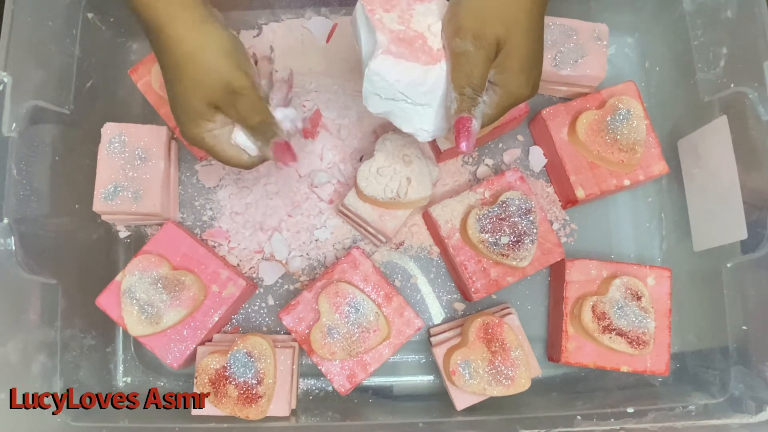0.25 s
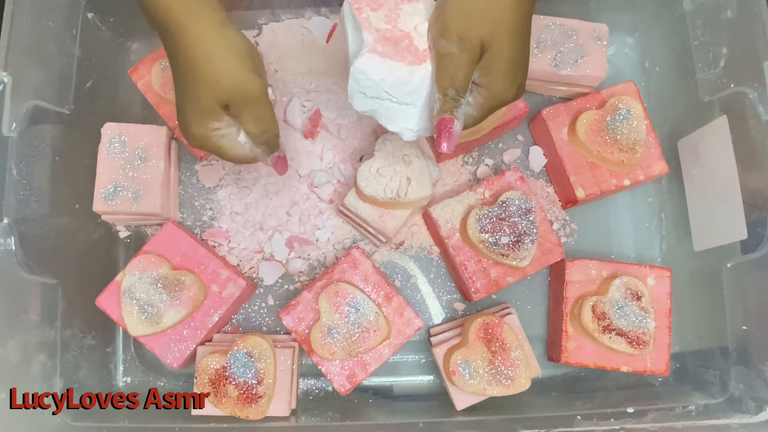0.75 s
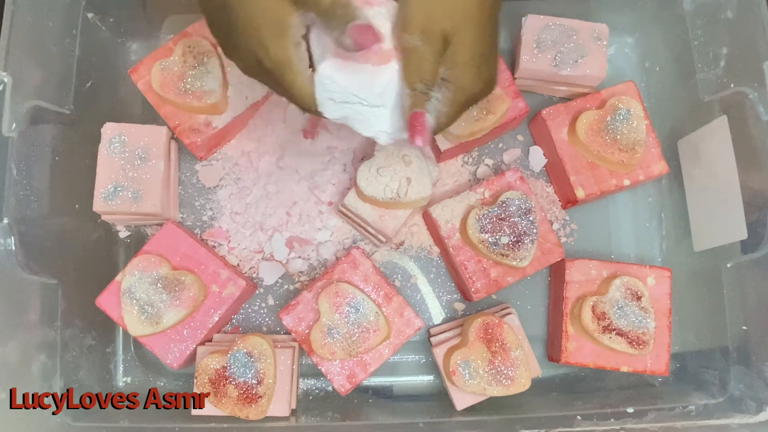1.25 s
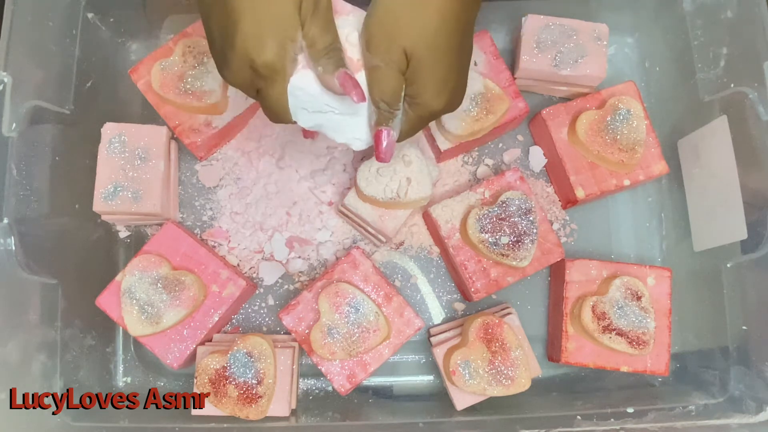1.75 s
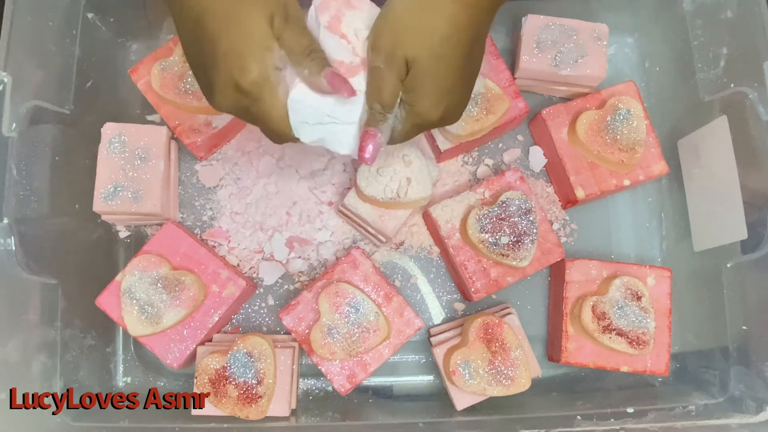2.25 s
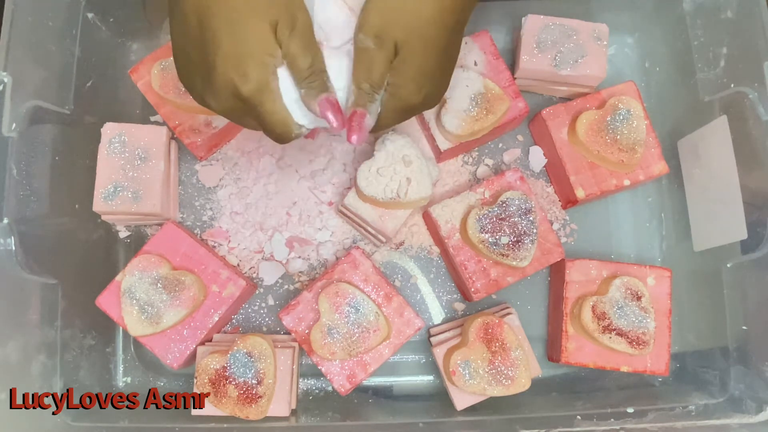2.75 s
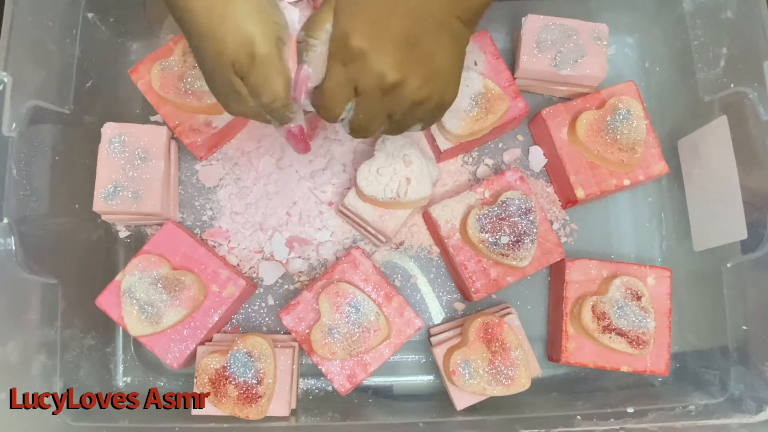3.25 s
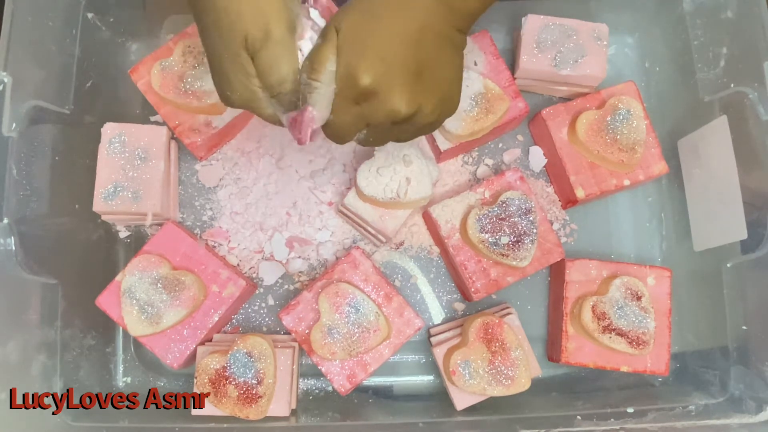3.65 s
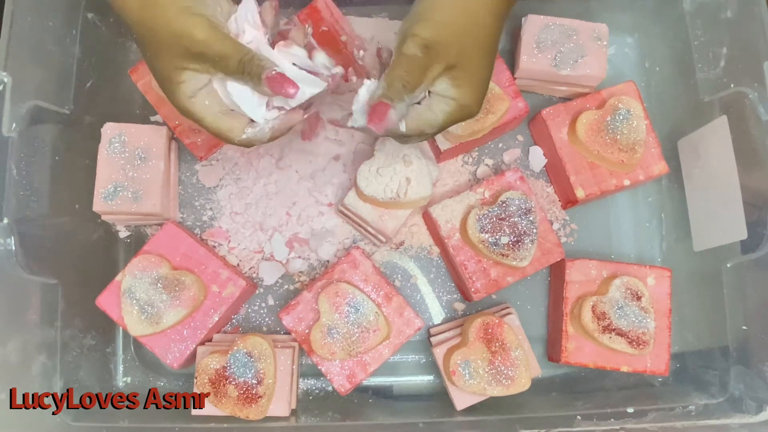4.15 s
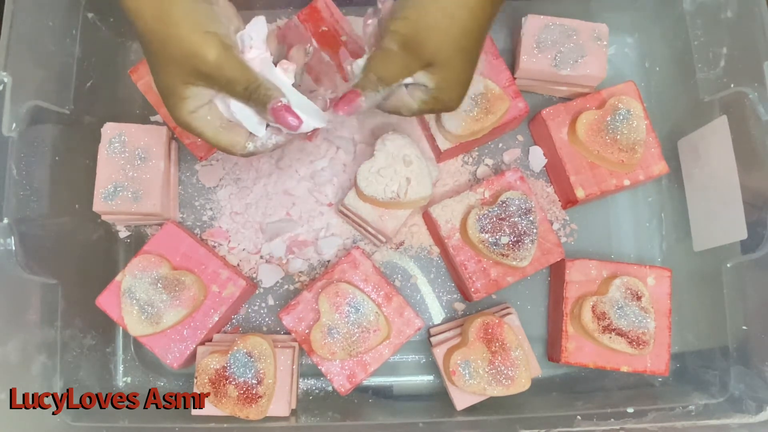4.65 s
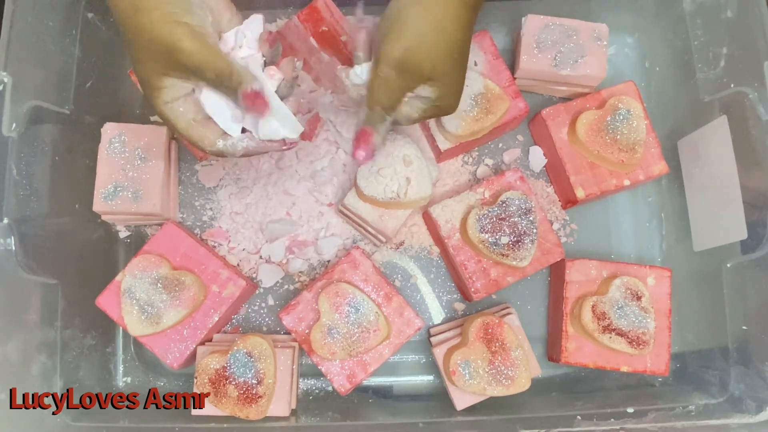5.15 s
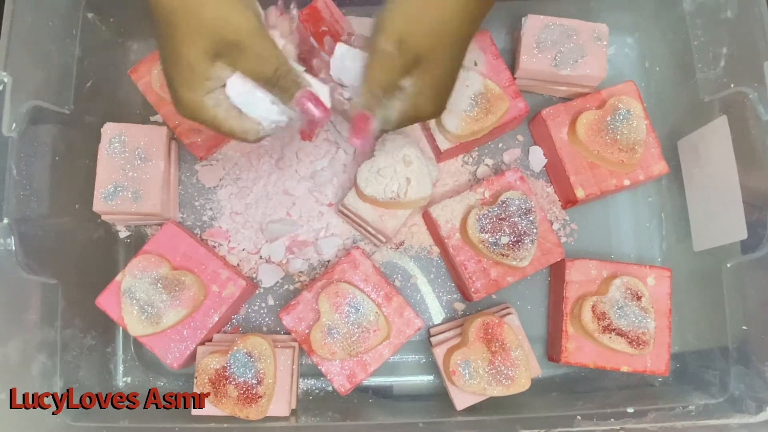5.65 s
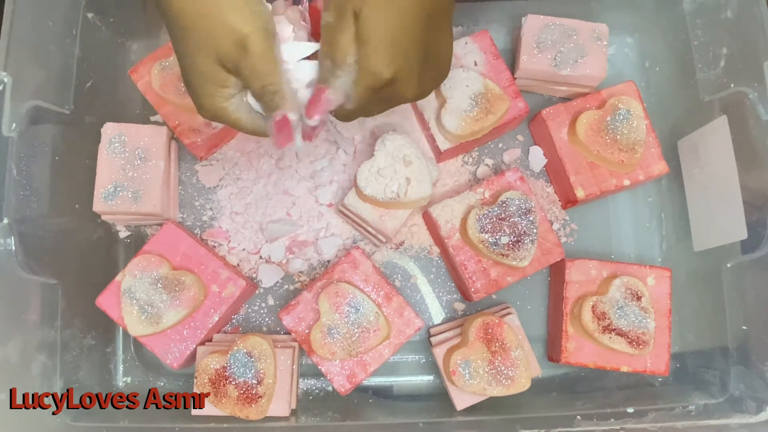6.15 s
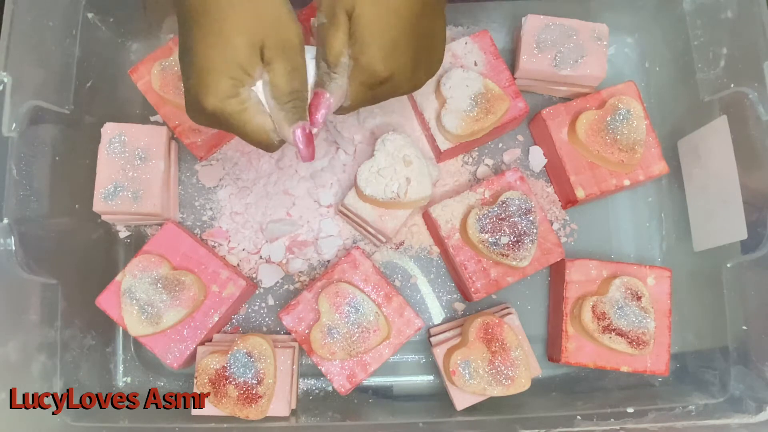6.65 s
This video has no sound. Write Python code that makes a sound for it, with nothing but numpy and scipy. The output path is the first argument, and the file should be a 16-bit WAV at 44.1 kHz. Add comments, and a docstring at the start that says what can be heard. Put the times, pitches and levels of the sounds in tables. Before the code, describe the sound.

Dry chalk blocks crack and crumble in hands over a plastic tub, with gritty crunches, small ticks and one heavy, hollow thump midway.

```python
"""Hands crumble and snap dry chalk blocks over a plastic tub, close to a phone in a small room.
Each crack is a quick shower of tiny clicks plus a knock: the ringing tones of the whole block.
Powder, grit and flakes are random clicks that swell as the fingers squeeze; a few shards ping.
Falling tones and ringing modes make the tub thump, most heavily once; the room adds a short tail.
Filtered noise and wavering tones make a low rumble and hum underneath."""
import sys
import numpy as np
from scipy import signal
from scipy.fft import rfft, irfft
from scipy.io import wavfile

SR = 44100
rng = np.random.default_rng(int(sys.argv[2]) if len(sys.argv) > 2 else 0)


def inscribe(sig):
    """Save sig as 16-bit PCM at rate SR to the path in sys.argv[1].

    A 1-D sig is mono; a 2-D sig holds one channel per row.
    Samples are clipped to [-1, 1] before scaling.
    """
    pcm = np.round(np.clip(np.atleast_2d(sig).T, -1, 1) * 32767)
    wavfile.write(sys.argv[1], SR, pcm.astype(np.int16))


N = 304284
T = np.arange(N) / SR  # time in seconds

# Low noise of the room. Each row: pitch in Hz, relative strength in dB per Hz.
RUMBLE = [(22, -39.5), (45, -1.5), (80, 0.5), (125, -1), (200, -6.5), (290, -13), (420, -16.5), (560, -24),
          (900, -23.5), (1400, -30), (2000, -32.5), (3000, -44.5), (6000, -56.5), (16000, -60.5)]
RUMBLE_DB = -53.5  # level of the whole rumble

# Hum tones in the room. Each row: pitch in Hz, level in dB.
HUM = [(87, -64.5), (119, -63.5), (160, -61), (269, -67.5), (532, -75)]

# How alike the two microphone ports hear. Each row: pitch in Hz, likeness from 0 to 1.
LIKENESS = [(60, .89), (130, .93), (250, .92), (600, .74), (1500, .42), (3000, .42), (6000, .3),
            (7000, .75), (11000, .93)]

# How much louder the left port hears. Each row: pitch in Hz, difference in dB.
LEFT_DB = [(100, 2), (500, 2.3), (4000, 2.8), (8000, .7), (14000, 1)]
TOP_HZ = 16100  # the phone cuts everything above this

# Thin ring of the tub walls. Each row: pitch in Hz, relative level in dB.
WALL_RING = [(1296, -11), (1620, 9.5), (2065, 0), (2361, 7.5), (2696, 10), (2881, 9), (3526, 9.5),
             (3762, 10), (4226, 7.5), (4364, 15), (4783, 6), (5590, -37), (6600, -4.5), (7227, -15.5)]

# Pitch ranges of the room's tail. Each row: low edge in Hz, high edge in Hz.
TAIL_BANDS = [(150, 900), (900, 2600), (2600, 7400), (9500, 16500)]
# Tail in each range. Each row: starting level in dB, time to fall by 60 dB in seconds.
TAILS = [(-35.5, 0.18), (-33.0, 0.23), (-34.5, 0.23), (-40.5, 0.18)]

# Fingers squeezing and rubbing. Each row: hardest moment in seconds, length in seconds,
# level in dB, coarse grit against fine powder in dB.
SQUEEZES = [(0.155, 0.074, -82.5, -5), (0.47, 0.094, -83, 0.5), (0.653, 0.035, -78.5, 5),
            (0.86, 0.08, -85.5, 0.5), (1.09, 0.092, -77.5, 0), (1.34, 0.097, -78, -2.5),
            (1.485, 0.079, -84.5, -2), (2.085, 0.17, -77, 6.5), (2.39, 0.16, -78, -3),
            (2.606, 0.14, -72, -2), (2.682, 0.023, -66.5, -8.5), (2.783, 0.059, -78.5, -1),
            (2.86, 0.03, -74.5, 0), (2.989, 0.066, -67.5, 4.5), (3.093, 0.045, -70.5, 3),
            (3.23, 0.48, -87, 9), (3.696, 0.042, -93, 15.5), (3.93, 0.24, -77.5, -2),
            (4.086, 0.12, -74.5, 5.5), (4.225, 0.12, -78.5, 4.5), (4.4, 0.12, -82.5, 2),
            (4.57, 0.045, -79.5, 6), (4.896, 0.081, -86, 4), (5.157, 0.16, -81, -5.5),
            (5.412, 0.08, -89, 9), (5.572, 0.47, -81, 1), (5.75, 0.13, -95, -10), (5.973, 0.029, -78, 2),
            (6.14, 0.035, -76, -16), (6.44, 0.16, -83, 9), (6.66, 0.77, -88, -1.5)]
# A squeeze builds over this share of its length; between squeezes the fingers barely brush (dB).
BUILD_SHARE, BRUSH_DB = 0.44, -101.5

# Grain sizes from powder to crumbs. Each row: low edge in Hz, high edge in Hz, grains per second.
GRAINS = [(13800, 16000, 7000), (9900, 12800, 7000), (5000, 8200, 4000), (2700, 5500, 2200),
          (600, 2600, 900)]

# The four registers (pitch ranges) of a fracture. Each row: low edge in Hz, high edge in Hz.
REGISTERS = [(650, 2400), (2500, 7100), (10000, 12500), (14100, 15800)]
FLAKE_COLOUR_DB = [-19, -3, -11, -3.5]  # flakes against the grit in each register

# Modes (ringing tones) of a thin, hard shard. Each row: pitch in Hz before scaling to the shard's # size,
# relative level in dB, multiple of the shard's fading time.
SHARD = [(3160, 15, 1.1), (3490, -22, 8), (5085, -7, 6.6), (6330, -13, 3.2)]
# Shards snapping off. Each row: start in seconds, level in dB, lowest mode in Hz, # fading time in seconds
# (each mode falls by 60 dB in this times its multiple).
CLINKS = [(4.6705, -48.5, 3050, 0.014), (5.8263, -44, 2010, 0.0043), (6.4815, -55.5, 1940, 0.0057)]
CLINK_ROOM_SHARE = .45  # cupped in the hands, shards send only this share into the room

# Blows on the tub. Each row: start in seconds, level in dB, upper edge of the blow in Hz.
THUMPS = [(0.665, -28.5, 102), (1.953, -54, 1000), (3.003, -16, 4000), (3.442, -61, 2020)]

# Modes of the tub. Each row: pitch in Hz, level in dB within a blow,
# time to fall by 60 dB in seconds.
TUB = [(80.4, -10.5, 0.14), (125, -3.5, 0.18), (160, -15, 0.18), (214, -11, 0.097), (318, -6, 0.12),
       (420, -24, 0.14), (627.4, -8.5, 0.097), (756, -12, 0.07), (898, -18, 0.093), (1048, -19.5, 0.1),
       (1280, -26, .07), (1524, -26, 0.07), (1640, -28.5, 0.088)]
# A blow crosses the thin tub floor as a bending wave: first pitch (Hz), growth of its period
# (s per s), level within the blow (dB), time to its peak (s).
SLAP_HZ, SLAP_STRETCH, SLAP_DB, SLAP_S = 1082, 0.566, -3.5, 0.0048

# Modes of a block held in the hands, before scaling to its size. Each row: pitch in Hz,
# relative level in dB, time to fall by 60 dB in seconds.
BLOCK = [(226, 6, 0.025), (330.4, -0.5, 0.026), (422.6, -5.5, 0.043), (641, -6, 0.023), (800, 1, 0.00096)]

# Chalk cracks and crunches. Each row: start in seconds, level in dB, brightness in dB (takes from
# the lowest register, adds to the top two), knock of the piece in dB, its lowest mode in Hz
# before a small random detuning, fade setting in ms.
CRACKS = [(0.426, -57.5, -3, -43, 290, 6.4), (0.438, -68, -3, -37.5, 280, 5.4),
          (0.4454, -73, -7, -44.5, 332, 3), (0.452, -69.5, -9, -47.5, 403, 2.6),
          (0.6196, -57.5, -4, -56, 400, 1.1), (1.067, -59.5, -4.5, -46.5, 302, 27),
          (1.096, -72, -3, -56, 450, 1.9), (1.1419, -56.5, -0.5, -48, 300, 6.1),
          (1.9015, -42.5, -3, -31.5, 270, 5.3), (1.9104, -65, -5, -53, 434, 5.8),
          (1.936, -53, -4, -56, 400, 1.9), (1.9484, -40, -2.5, -43.5, 250, 11),
          (1.9522, -44.5, 7, -31, 420, 1.9), (1.9535, -44.5, -10, -25.5, 272, 4.8),
          (1.9613, -39.5, 1, -49, 407, 0.99), (1.9637, -44, -11, -42, 335, 1.6),
          (1.9717, -51.5, 20.5, -57.5, 600, 0.7), (2.024, -51, -3.5, -45.5, 334, 4),
          (2.0313, -41, 0, -54, 485, 1.8), (2.0415, -46, 4, -50, 218, 2.5), (2.055, -63, -3, -70, 500, 1.8),
          (2.1387, -50.5, 0.5, -55.5, 416, 3), (2.922, -57.5, -1, -42, 262, 3.8),
          (2.928, -54.5, -5, -38, 360, 4.7), (2.939, -47.5, -3, -32, 292, 8.3),
          (3.0048, -62, -14.5, -42, 480, 2.5), (3.043, -63, -2, -37, 324, 3),
          (3.126, -70.5, -11, -73, 710, 2.6), (3.439, -33, -5, -41.5, 291, 3.7),
          (3.4416, -50.5, -10.5, -43, 326, 4), (3.446, -37, 6.5, -45.5, 293, 1.35),
          (3.4521, -43.5, -6.5, -53, 606, 0.97), (3.46, -49, 2, -64, 603, 0.42),
          (3.4981, -59, 2, -71, 600, 0.5), (3.695, -58, 10, -77, 1730, 1.16),
          (3.8333, -63.5, 0, -57, 400, 3.8), (3.9355, -63, -7, -59.5, 644, 2.6),
          (4.069, -59, -4, -42, 306, 14.5), (4.082, -59, 2, -70, 407, 1.3),
          (4.094, -57.5, -5.5, -55, 510, 3.8), (4.13, -59, -2, -56, 620, 1.3),
          (4.1993, -67, -1, -69, 1510, 0.86), (4.282, -64, -5.5, -53, 297, 1.9),
          (4.532, -55.5, 5.5, -41, 302, 1.3), (4.5433, -66, -8, -43.5, 470, 3.8),
          (4.582, -64.5, -18.5, -42.5, 385, 1.1), (4.658, -71, 7, -65, 690, 1.2),
          (4.67, -50.5, 1.5, -45, 380, 0.68), (4.6724, -63, -9, -69, 614, 1.6),
          (5.5237, -55.5, 1.5, -63, 695, 2.3), (5.5482, -50, -0.5, -52, 377, 1.5),
          (5.634, -48.5, -1, -51, 380, 2.8), (5.826, -52, -0.5, -50.5, 650, 3.1),
          (6.2711, -61.5, -4.5, -45, 250, 1.7), (6.481, -46.5, 1, -55.5, 453, 1.53),
          (6.8818, -56, 1, -65, 403, 2.6), (6.891, -52.5, -2.5, -39, 443, 14)]
# At EVEN_MS the second register gets no boost; each halving of the fade setting adds SNAP_DB.
EVEN_MS, SNAP_DB = 2.68, 5.5

# Small chips flicking off with a bright tick. Each row: start in seconds, level in dB.
CHIPS = [(0.14, -74), (0.767, -75.5), (1, -73), (1.057, -76), (1.082, -70), (1.113, -72), (1.1355, -69),
         (1.18, -68.5), (1.221, -73), (2.4386, -74.5), (2.565, -86), (3.3549, -59), (3.711, -63),
         (4.0427, -63), (4.0725, -67), (4.138, -71), (4.189, -67.5), (4.238, -71), (4.377, -78),
         (4.385, -68.5), (5.243, -76), (5.4535, -72.5), (5.582, -73), (5.645, -69), (5.6807, -64.5),
         (5.848, -64), (5.9056, -66), (6.364, -64.5), (6.6315, -79.5), (6.691, -83)]
# CHIP_HZ is the middle of the chips' lowest modes; the spread is in natural-log pitch.
CHIP_BRIGHT_DB, CHIP_KNOCK_DB, CHIP_MS, CHIP_HZ, CHIP_SIZE_SPREAD = 7.5, -9.5, 1.4, 1145, 0.41

# Loose pieces bumping dully. Each row: start in seconds, knock level in dB,
# lowest mode in Hz before a small random detuning.
BUMPS = [(0.4826, -49.5, 520), (0.9744, -44.5, 318), (2.0716, -45.5, 313), (2.2308, -44.5, 260),
         (3.111, -43, 257), (3.3084, -54, 348), (4.398, -48.5, 211)]
BUMP_SCRAPE_DB, BUMP_BRIGHT_DB, BUMP_MS = -23, -9, 12


def undb(db):
    """Turn decibels into gain."""
    return 10 ** (np.asarray(db) / 20)


def unit(x):
    """Scale each channel to an average (rms) size of 1."""
    return x / np.sqrt(np.mean(x ** 2, axis=-1, keepdims=True) + 1e-30)


def band(x, lo_hz, hi_hz, order=3):
    """Keep only the pitches between two edges."""
    return signal.sosfilt(signal.butter(order, [lo_hz, hi_hz], "band", fs=SR, output="sos"), x)


def over_hz(points):
    """Read (Hz, value) points at every bin of the spectrum."""
    hz, value = np.transpose(points)
    bins_hz = np.arange(N // 2 + 1) * SR / N
    return np.interp(np.log(bins_hz + 1), np.log(hz), value)


def add(track, s, sound):
    """Mix a sound in at time s, cut off at the end of the track."""
    i = int(s * SR)
    track[..., i:i + sound.shape[-1]] += sound[..., :max(N - i, 0)]


def walk(rate_hz):
    """Wander slowly at random, with a typical size of 1."""
    smooth = signal.butter(2, rate_hz, fs=SR, output="sos")
    return unit(signal.sosfilt(smooth, rng.standard_normal(N)))


def grains(size, per_s, spread_db):
    """Two rows of random clicks: many small, a few large."""
    present = rng.random((2, size)) < per_s / SR
    loudness_db = spread_db * np.minimum(rng.exponential(size=size), 4)
    return present * rng.standard_normal((2, size)) * undb(loudness_db)


def struck(modes, t, build_cycles=None):
    """Each mode of a struck body is a fading sine; neighbours start in opposite directions."""
    ring = 0
    for k, (hz, db, t60) in enumerate(modes):
        tone = (-1) ** k * undb(db - 60 * t / t60) * np.sin(2 * np.pi * hz * t)
        if build_cycles:
            tone = tone * (1 - np.exp(-hz * t / build_cycles))  # swings up over some cycles
        ring = ring + tone
    return ring


def rumble():
    """Steady low room noise: random noise with its spectrum shaped by the table."""
    spectrum = rfft(rng.standard_normal((2, N))) * undb(over_hz(RUMBLE))
    return unit(irfft(spectrum, N)) * undb(RUMBLE_DB)


def hum(waver=0.42, waver_hz=4.37):
    """Low tones that waver in level and phase, the higher ones more."""
    total = 0
    for hz, db in HUM:
        depth = waver * hz / HUM[0][0]
        wavering = 1 + depth * (walk(waver_hz) + 1j * walk(waver_hz))
        total = total + undb(db) * unit((wavering * np.exp(2j * np.pi * hz * T)).real)
    return total


def ports(x):
    """Row 0 reaches both microphone ports with a small lag; row 1 only the right one."""
    bass_lag_s, treble_lag_s = .00014, -.000265
    first, second = rfft(x)
    hz = np.arange(len(first)) * SR / N
    lag_s = over_hz([(5200, bass_lag_s), (6200, treble_lag_s)])
    like = over_hz(LIKENESS)
    lean = undb(over_hz(LEFT_DB) / 2)  # half the level difference goes to each side
    shared = like * first * np.exp(-2j * np.pi * hz * lag_s)
    right = shared + np.sqrt(1 - like ** 2) * second
    return irfft(np.array([first * lean, right / lean]), N)


def room(x, ring_db=-22, ring_t60=0.15, build_s=0.00032):
    """Add the thin ring of the tub walls and the short, even tail of the room."""
    t = T[:SR // 2]
    noise = rng.standard_normal((len(TAIL_BANDS), 2, len(t)))
    build = 1 - np.exp(-t / build_s)
    ring = sum(undb(db) * np.sin(2 * np.pi * (hz * t + rng.random((2, 1)))) for hz, db in WALL_RING)
    fading_ring = ring * build * undb(-60 * t / ring_t60)
    response = unit(fading_ring) * undb(ring_db) / np.sqrt(len(t))
    for hiss, (lo, hi), (db, t60) in zip(noise, TAIL_BANDS, TAILS):
        response = response + band(hiss, lo, hi, order=2) * undb(db - 60 * t / t60) * build
    # what the chalk sends out in different directions mixes in the room
    wet = signal.fftconvolve(x[:1], response, axes=1)
    wet = wet + signal.fftconvolve(x[1:], response[::-1], axes=1)
    return x + wet[:, :N] / np.sqrt(2)


def tub(build_cycles=0.87, mistune=0.046, push_s=0.00062,
        rattle_db=-19, rattle_t60=0.02, grit_db=-16, grit_t60=0.026):
    """A blow sends a falling bending wave through the tub, its modes swing up and pieces rattle."""
    out, t = np.zeros((2, N)), T[:SR // 2]
    push = 1 - np.exp(-t / push_s)
    slap_shape = undb(SLAP_DB) * t / SLAP_S * np.exp(1 - t / SLAP_S)
    slap_cycles = np.log1p(SLAP_STRETCH * SLAP_HZ * t) / SLAP_STRETCH
    slap = slap_shape * np.sin(2 * np.pi * slap_cycles)
    for s, db, top_hz in THUMPS:
        noise = rng.standard_normal((2, len(t)))
        rattle = unit(band(noise, 90, 750, order=2)) * undb(rattle_db - 60 * t / rattle_t60)
        grit = unit(band(noise, 900, 2000)) * undb(grit_db - 60 * t / grit_t60)
        blow = (rattle + grit) * push
        # the two sides of the tub ring out of tune with each other
        one_side = slap + struck(TUB, t, build_cycles)
        other_side = struck(TUB, t * (1 + mistune), build_cycles)
        blow = blow + np.array([one_side, other_side])
        add(out, s, undb(db) * band(blow, 48, top_hz, order=2))
    return out


def squeezing(roundness=1.37):
    """Each squeeze swells and dies away; returns levels in dB of fine powder and coarse grit."""
    fine = coarse = undb(BRUSH_DB) ** 2  # powers, so overlapping squeezes add up
    for s, length_s, db, grit_db in SQUEEZES:
        away = np.maximum((s - T) / BUILD_SHARE, (T - s) / (1 - BUILD_SHARE)) / length_s
        power = undb(db) ** 2 * np.exp(-np.minimum(away, 10) ** roundness)
        fine = fine + power
        coarse = coarse + power * undb(grit_db) ** 2
    return 10 * np.log10(fine), 10 * np.log10(coarse)


def grinding(fine, coarse, dust_db=-4.5, powder_db=1.0, sand_db=-4.0, grit_db=-1.5, crumb_db=-2.0):
    """Dense tiny grains hiss, sparser crumbs tick; all swell as the fingers stick and slip."""
    slip_db, patchy_db, spread_db = 1.6, 2., 2.8
    slip = slip_db * walk(27)  # shared by all grain sizes
    levels = [fine + dust_db, fine + powder_db, coarse + sand_db, coarse + grit_db, coarse + crumb_db]
    total = 0
    for (lo, hi, per_s), db in zip(GRAINS, levels):
        layer = unit(band(grains(N, per_s, spread_db), lo, hi, order=2))
        total = total + layer * undb(db + slip + patchy_db * walk(3.4))
    return total


def flakes(coarse, per_s=45, spread_db=2.0):
    """Tiny flakes break away as random clicks, louder the harder the fingers press."""
    clicks = grains(N, per_s, spread_db)
    return sum(unit(band(clicks, lo, hi)) * undb(coarse + db)
               for (lo, hi), db in zip(REGISTERS, FLAKE_COLOUR_DB))


def clinks():
    """A shard that snaps off rings briefly in its own modes."""
    out = np.zeros((2, N))
    for s, db, shard_hz, t60 in CLINKS:
        scale = shard_hz / SHARD[0][0]
        modes = [(hz * scale, mode_db, t60 * longer) for hz, mode_db, longer in SHARD]
        add(out, s, undb(db) * struck(modes, T[:SR // 4]))
    return out


def fracture(db, bright_db, body_db, piece_hz, fade_ms, crack_db=0., snap_db=0., edge_db=-4.0,
             top_db=-9.5, rise_ms=0.224, spread_db=4.5, echo_db=-12, echo_ms=2.6):
    """Breaking chalk gives a dying shower of clicks, echoed by the tub; released strain knocks it."""
    fade, detune, crunch = .34, .05, .4  # share of fade_ms, random pitch spread, roughness
    size = SR // 12
    t = T[:size]
    ms = t * 1000
    dying = (1 - np.exp(-ms / rise_ms)) * np.exp(-(ms / (fade * fade_ms)) ** 0.5)
    snap = snap_db + SNAP_DB * np.log2(EVEN_MS / fade_ms)  # quicker fractures snap more
    colour = [crack_db - bright_db, snap, edge_db + bright_db, top_db + bright_db]

    # the hands keep moving, so the quick echoes differ from crack to crack
    echo_noise = rng.standard_normal((2, size)) * np.exp(-ms / echo_ms) * (ms > 1)
    echoes = unit(echo_noise) * undb(echo_db)
    shower = 0
    for (lo, hi), colour_db in zip(REGISTERS, colour):
        clicks = unit(grains(size, 9000, spread_db) * dying) + echoes
        shower = shower + unit(band(clicks, lo, hi, order=2)) * undb(db + colour_db)

    # smaller pieces ring higher and shorter; a slow fracture shakes longer and more roughly
    scale = piece_hz / BLOCK[0][0] * np.exp(detune * rng.standard_normal())
    ring = struck(BLOCK, t * scale)
    shaking = rng.standard_normal((2, size)) * dying
    shake = unit(signal.fftconvolve(ring[None], shaking, axes=1)[:, :size])
    knock = unit(ring * (1 - np.exp(-2 * ms / fade_ms))) + crunch * fade_ms / 5 * shake[0]
    body = unit(np.array([knock, shake[1]])) * undb(body_db)
    # the given levels hold for the energy spread over 5 ms
    return (shower + body) * np.sqrt(.005 * SR / size)


def cracks():
    """Cracks vary in colour and length; chips are short and bright; bumps are mostly knock."""
    out = np.zeros((2, N))
    for s, db, bright_db, body_db, piece_hz, fade_ms in CRACKS:
        add(out, s, fracture(db, bright_db, body_db, piece_hz, fade_ms))
    for s, db in CHIPS:
        chip_hz = CHIP_HZ * np.exp(CHIP_SIZE_SPREAD * rng.standard_normal())
        add(out, s, fracture(db, CHIP_BRIGHT_DB, db + CHIP_KNOCK_DB, chip_hz, CHIP_MS))
    for s, db, piece_hz in BUMPS:
        add(out, s, fracture(db + BUMP_SCRAPE_DB, BUMP_BRIGHT_DB, db, piece_hz, BUMP_MS))
    return out


def scene():
    """Chalk and tub sound into the room; powder is dry, shards partly so; hum and rumble lie under."""
    background = rumble() + np.array([hum(), np.zeros(N)])
    fine, coarse = squeezing()
    shards = clinks()
    near = shards * (1 - CLINK_ROOM_SHARE) + grinding(fine, coarse)
    into_room = cracks() + tub() + flakes(coarse) + shards * CLINK_ROOM_SHARE
    return ports(room(into_room) + near + background)


def record(dry):
    """The phone cuts the highest treble with a steep low-pass filter."""
    return signal.sosfilt(signal.ellip(8, .2, 60, TOP_HZ, fs=SR, output="sos"), dry)


dry = scene()
out = record(dry)
inscribe(out)
```